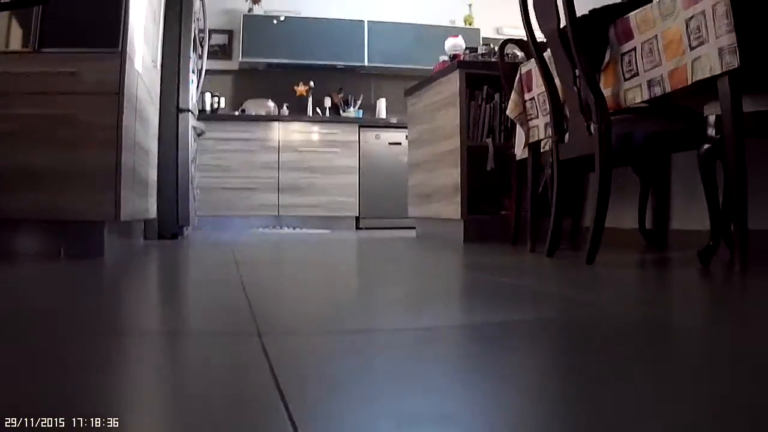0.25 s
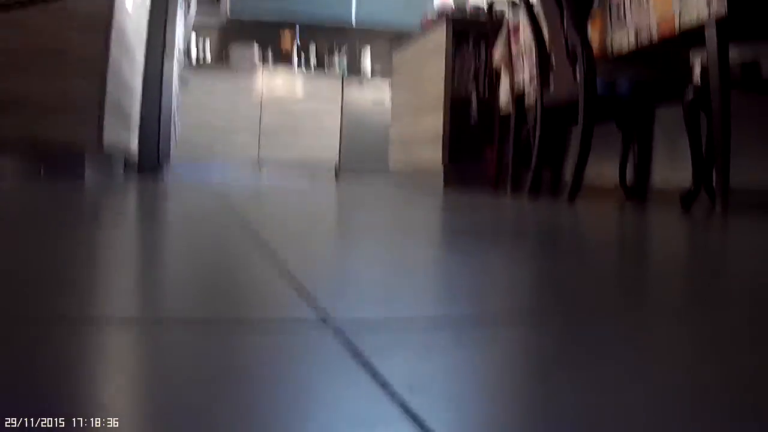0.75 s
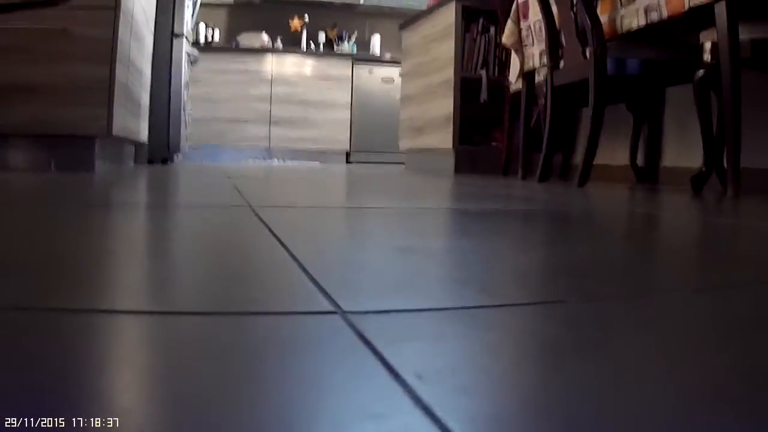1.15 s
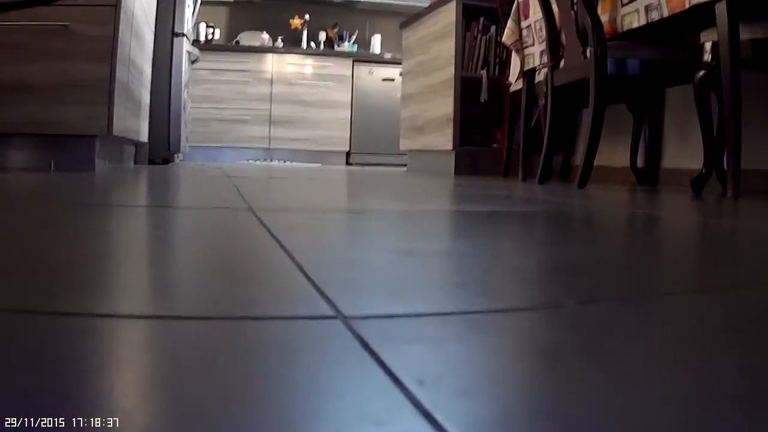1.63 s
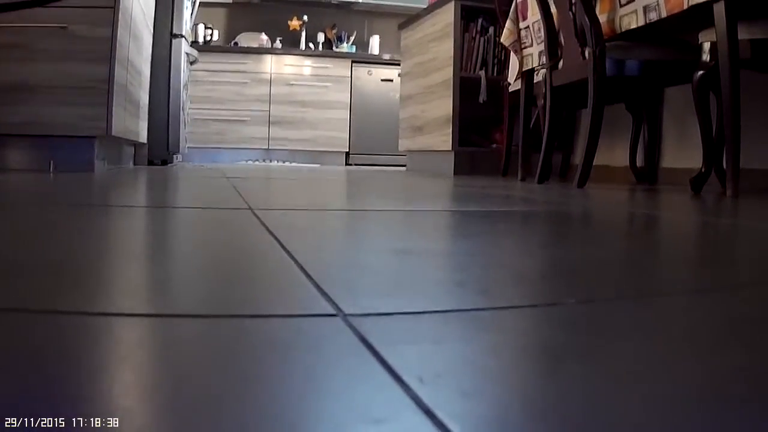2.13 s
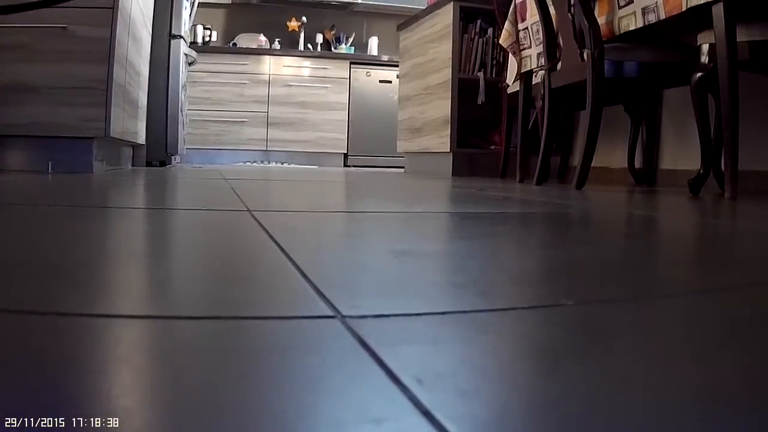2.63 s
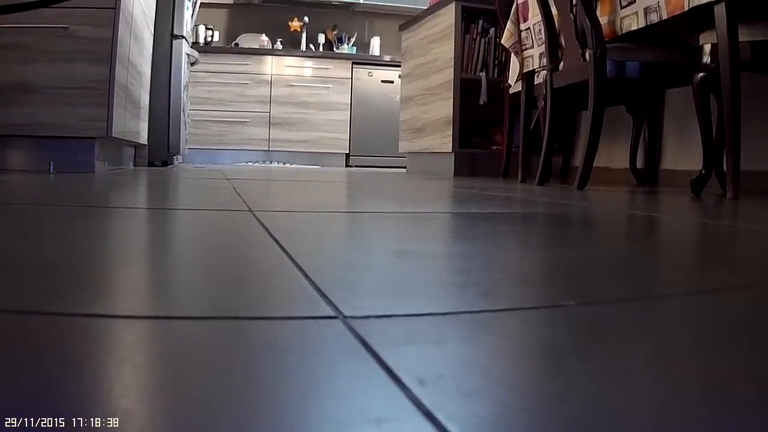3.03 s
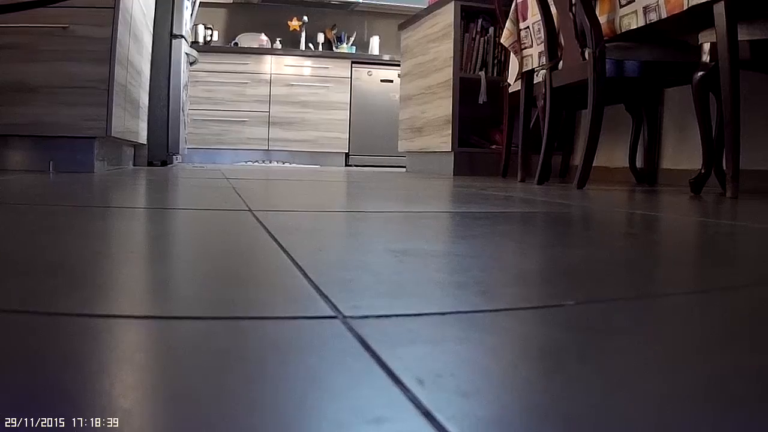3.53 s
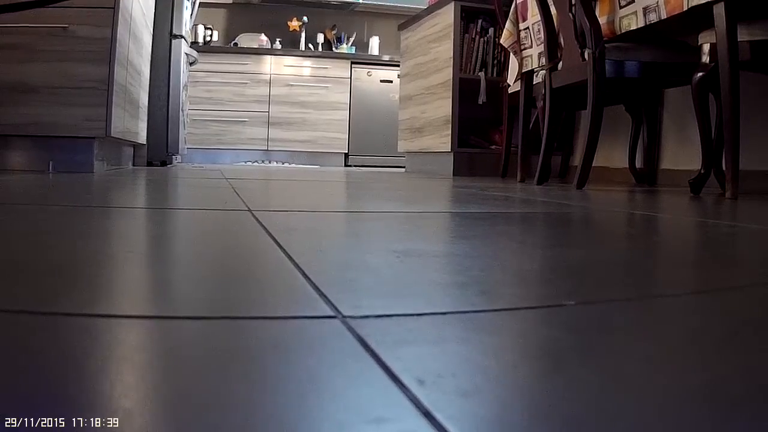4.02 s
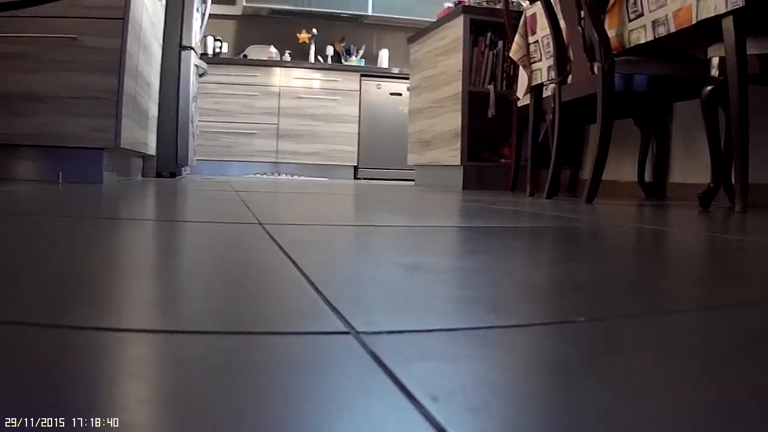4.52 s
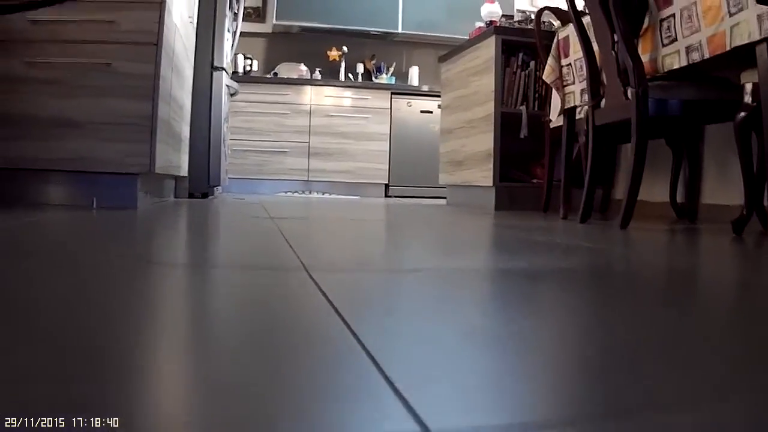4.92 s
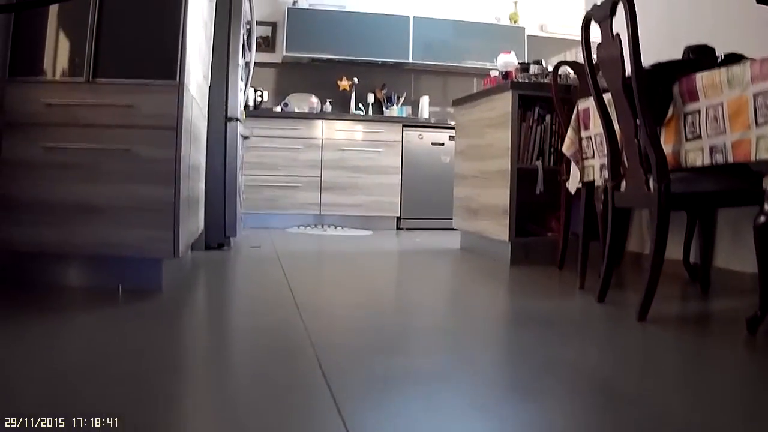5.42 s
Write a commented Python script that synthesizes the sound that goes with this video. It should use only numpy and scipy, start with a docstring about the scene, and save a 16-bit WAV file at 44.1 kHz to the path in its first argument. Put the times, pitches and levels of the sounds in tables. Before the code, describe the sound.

A small plastic drone clacks down on kitchen tile, sits in near silence, then its motors whine up into a steady high buzz.

```python
"""A small geared quadcopter is set down on a kitchen floor: legs crack on tile, the frame rings, loose parts chatter.
It waits over quiet room tone, with a few small clicks, a faint rustle and a knock across the room.
Then the switched motor current whistles while four brushed motors spin up, with shaft tones and gear rasp.
The propeller wash swells, then drops away as the craft lifts off into a steady buzz.
Tones are sums of shaft harmonics; rasp, wash and impacts are shaped noise; struck parts are decaying modes."""
import sys
import numpy as np
from scipy import signal
from scipy.fft import rfft, irfft, next_fast_len
from scipy.io import wavfile
from scipy.ndimage import map_coordinates

SR = 44100
rng = np.random.default_rng(int(sys.argv[2]) if len(sys.argv) > 2 else 0)


def store_pcm(level_fs):
    """Save levels as 16-bit WAV."""
    pcm = np.round(np.clip(level_fs, -1, 1) * 32767).astype(np.int16)
    wavfile.write(sys.argv[1], SR, np.atleast_2d(pcm).T)


N = 249606
T = np.arange(N) / SR  # time [s]

# Noise spectra, shell and echoes below give relative levels; each source sets its own final level.
# Speed asked of each shaft: (time [s], slow motor 1 [Hz], slow motor 2 [Hz], fast motor 1 [Hz], fast motor 2 [Hz])
ASKED_SPEEDS = [(4.08, 644.0, 551.0, 732.0, 718.0), (4.2, 598.0, 572.0, 649.0, 606.0),
                (4.52, 603.0, 599.0, 629.0, 629.0), (4.72, 599.0, 574.0, 639.0, 653.0),
                (4.98, 563.4, 560.6, 667.8, 662.4), (5.24, 568.2, 564.8, 668.8, 664.2),
                (5.36, 561.0, 544.0, 656.4, 653.4), (5.52, 555.4, 536.4, 643.2, 642.0),
                (5.66, 558.4, 541.2, 641.2, 632.4)]
# Shaft harmonics (three rotor poles, nine pinion teeth):
# (multiple of shaft speed [1], relative level of each motor in the order above [dB] x 4)
SHAFT_ORDERS = [(1, -34.5, -26, -19.5, -28.5), (3, -17.7, -20, -23, -29), (4, -50, -43, -35, -40),
                (6, -31, -33, -34, -28), (9, -24, -35, -27.5, -33.5), (10, -52, -48, -35, -59),
                (12, -56, -54, -46, -41), (15, -48, -60, -53, -51)]
# How much strain brings out the orders: one entry per motor [dB]
STRAIN_GAINS = [1.7, 5.1, 5.6, 5.8]
# Blade thrum of each propeller before the speed law: one entry per motor [dB]
BLADE_LEVELS = [-35, -50, -42, -52.5]
# Response of the plastic shell to the shaft tones: (frequency [Hz], gain [dB])
SHELL_RESPONSE = [(100, -54), (340, -39), (430, -11.5), (650, -7), (850, -7.5), (1100, -10), (1400, -4),
                  (1650, 0.5), (2000, -1.5), (2280, -0.5), (2500, -6), (3400, -13), (4100, -5), (5100, 0.5),
                  (7000, -20), (12000, 3)]
# Spectrum of the gear rasp: (frequency [Hz], relative density [dB])
RASP_SPECTRUM = [(150, -11), (350, -11), (480, -3), (800, 5), (1100, -5.5), (2200, -9), (3000, -3),
                 (3800, 2.5), (5200, 2.5), (7800, 0), (9100, -5), (10400, 2), (11600, -11.5), (15000, -18),
                 (15700, -32)]
# Main shell resonance, driven by the gears: (frequency [Hz], relative density [dB])
DRONE_SPECTRUM = [(600, -115), (1200, -5), (1600, 16), (2150, 10.5), (2600, -5.5), (4000, -101)]
# Spectrum of the propeller wash: (frequency [Hz], relative density [dB])
WASH_SPECTRUM = [(15, 0), (50, -2), (100, -6), (200, -10), (350, -19), (800, -40)]
# Harmonics of the switched current: (multiple [1], relative level [dB], scale of the phase ripple [rad])
WHISTLE_ORDERS = [(1, -1.5, 0.88), (2, -8.5, 1.3), (3, -22, 1.4), (4, -38, .7)]
# Legs meeting the tiles: (time [s], blow level [dB], ring level relative to the blow [dB])
LEG_BLOWS = [(0.6788, -17.5, -11), (0.6868, -16.5, -2), (0.6914, -21.5, 1), (0.7473, -15.5, -7),
             (0.7966, -22, 2.5)]
# Modes of the frame: (frequency [Hz], mean relative level [dB], t60 [s])
FRAME_MODES = [(647, 4, 0.11), (947, 2.5, 0.029), (1322, 0.5, 0.078), (1680, -3, 0.023),
               (1887, -6.5, 0.074), (2120, -14, 0.045), (2970, -22, 0.043)]
# Spectrum of an impact crack: (frequency [Hz], relative density [dB])
CRACK_SPECTRUM = [(60, 6), (200, -15), (500, -2), (1500, 10), (3000, -8), (6500, -4), (9000, -16),
                  (12000, -15.5), (15500, -39)]
# Blows to one arm of the frame: (time [s], relative level [dB])
ARM_STRIKES = [(.69, -11), (.918, -39.5)]
# Bursts of loose parts chattering: (time [s], relative level [dB], t60 [s])
RATTLE_BURSTS = [(0.749, -28.5, .18), (.812, -29.5, 0.12), (.9, -56, .45)]
# Small clicks around the room: (time [s], relative level [dB], knock level relative to the click [dB])
SMALL_CLICKS = [(0.5854, -55, 12), (0.9885, -42, -3), (1.0991, -53, -14), (1.8668, -61.5, 22),
                (1.9066, -47, -16), (1.933, -45, -14), (2.0554, -52, -10), (2.7982, -52, 9),
                (3.0133, -56, -10), (3.5865, -51, -12), (3.6363, -46, -12), (3.8222, -38, 3),
                (3.8836, -28.5, -4)]
# Spectrum of the dry click: (frequency [Hz], relative density [dB])
TICK_SPECTRUM = [(500, 2), (2000, -2), (3700, 4), (5000, -1), (7500, -1), (10000, -4), (15500, -16)]
# Spectrum of its hollow knock: (frequency [Hz], relative density [dB])
KNOCK_SPECTRUM = [(200, -9), (500, 3), (800, 2), (1200, -2), (1650, 2), (2200, -11), (4000, -33)]
# Spectrum of the distant knock: (frequency [Hz], relative density [dB])
FAR_KNOCK_SPECTRUM = [(300, -38), (550, -20), (760, -2), (1100, -0.5), (1600, 4), (2200, -12), (2900, -18),
                      (3700, -10), (6000, -18), (13000, -43)]
# Spectrum of the rustle: (frequency [Hz], relative density [dB])
RUSTLE_SPECTRUM = [(1470, -46), (2500, -21), (4040, 1), (5750, -6), (7530, -3), (8680, -9), (10200, 0),
                   (15000, -21)]
# Drift of the room hiss: (time [s], relative level [dB])
HISS_DRIFT = [(1.2, -63), (1.52, -64.5), (1.88, -62), (3.72, -65.5), (3.8, -62.5)]
# Spectrum of the room hiss: (frequency [Hz], relative density [dB])
HISS_SPECTRUM = [(40, -3), (160, 1), (300, -2), (420, -6), (800, -7), (1500, -6), (2400, -16), (5000, -19),
                 (10000, -20), (15500, -23)]
# Spectrum of the room rumble: (frequency [Hz], relative density [dB])
RUMBLE_SPECTRUM = [(8, -1), (22, 15.5), (30, 6), (50, -15), (120, -94)]
# Reverberation of the kitchen: (frequency [Hz], t60 [s])
ROOM_DECAY = [(150, 1), (1500, 0.46), (5000, 0.42), (14000, 0.39)]

POWER_ON_S = 3.882
SPIN_FROM_S, SPIN_UP_S = 3.865, 1.13  # start and length of the run-up
EASE_S, EASED_S = 4.454, 4.835  # the strain on the gears lets go between these times
LIFT_S, CLIMB_S = 4.704, 0.76  # lift-off, and the time taken to clear the floor's backwash
THROTTLE_S, IDLE_DUTY, HOVER_DUTY = 0.85, 0.051, 0.94  # opening time, duty cycle from and to
HOVER_HZ = 600  # reference shaft speed for the wash
MESH_HZ = 161  # shaft speed at which the gears bite fully
SLIP = 0.014  # scale of the shaft angle jitter [rad]
SWITCH_HZ = 3667.5  # switching frequency of the motor current
ECHO_DB = -14  # room echo of the rotor tones
TOP_HZ = 15750  # band limit of the microphone channel


def flight(rasp_db=-24.5, rasp_strain_db=6.0, rasp_power=3.45, grain_db=0.7,
           drone_db=-29.5, hammer_db=21.5, hammer_power=4, drone_power=3.0):
    """Gear noise: tooth contact, more regular with speed and louder under strain, joins the rotor tones."""
    speed = shaft_speeds().mean(axis=0)
    tones, chatter = rotors()
    regular = 0.8 * (speed / speed.max()) ** 2  # power share of the repeating tooth pattern
    teeth = np.sqrt(regular) * chatter + np.sqrt(1 - regular) * rng.standard_normal(N)
    teeth = teeth * amp(grain_db * wobble(350))
    rasp_gain = bite(rasp_power) * amp(rasp_db + rasp_strain_db * strain())
    rasp = rasp_gain * unit(coloured(teeth, RASP_SPECTRUM))
    # the loose gears hammer the shell hardest while they accelerate
    drone_gain = bite(drone_power) * amp(drone_db + hammer_db * acceleration() ** hammer_power)
    drone = drone_gain * unit(coloured(teeth, DRONE_SPECTRUM))
    # the room's echo lags behind the rising tones and beats with them
    echo = amp(ECHO_DB) * room(tones)
    return (tones + echo + rasp + drone) * (T > POWER_ON_S)


def rotors(gear_ratio=10.9, eccentric_rad=0.046, flutter_db=1.0, sway_db=2.16, brush_db=-9,
           full_hz=560, pull_db=5, bite_power=2.9, sing_hz=225):
    """Order synthesis: shaft harmonics plus a geared two-blade propeller's thrum; gives tones and chatter."""
    tones, blades, chatter = np.zeros((3, N))
    for motor, speed in enumerate(shaft_speeds()):
        turns = np.cumsum(speed) / SR
        prop_turns = turns / gear_ratio
        # backlash and an off-centre gear shake the shaft angle
        backlash = SLIP * wobble(130)
        off_centre = eccentric_rad * turn_pattern(prop_turns, count=4)
        angle = 2 * np.pi * turns + backlash + off_centre
        load = amp(flutter_db * wobble(45))
        edge_db = STRAIN_GAINS[motor] * strain()
        for multiple, *levels in SHAFT_ORDERS:
            strained = round(multiple) != 3  # strain brings out every order but the pole tone
            level_db = levels[motor] + strained * edge_db + sway_db * wobble(9.9)
            tones += load * amp(level_db) * np.sin(round(multiple) * angle)
        # two blades pass per propeller turn
        thrum = np.sin(4 * np.pi * prop_turns) + 0.16 * np.sin(8 * np.pi * prop_turns)
        blades += amp(BLADE_LEVELS[motor]) * (speed / full_hz) ** 2 * load * thrum
        # uneven teeth repeat with the propeller, brush scrape with the shaft
        chatter += turn_pattern(prop_turns, count=260)
        chatter += amp(brush_db) * turn_pattern(turns, count=24)
    # pull raises the tones most at the start of the run-up
    drive = bite(bite_power, sing_hz) * amp(pull_db * acceleration() ** 3)
    return np.sqrt(2) * (coloured(drive * tones, SHELL_RESPONSE) + blades), unit(chatter)


def shaft_speeds():
    """Run-up kinematics: each shaft closes in on the speed asked of it [Hz]."""
    return np.array(curves(ASKED_SPEEDS)) * (1 - acceleration() ** 2)


def acceleration():
    """Linear decline of motor pull: 1 until the run-up starts, 0 once up to speed."""
    return 1 - ramp(SPIN_FROM_S, SPIN_UP_S)


def strain():
    """Gear load: held at 1 through most of the run-up, then relieved to 0 around lift-off."""
    return 1 - ramp(EASE_S, EASED_S - EASE_S)


def bite(power, mesh_hz=MESH_HZ):
    """Power law of gear excitation: gain grows with speed until the teeth mesh fully."""
    return np.minimum(shaft_speeds().mean(axis=0) / mesh_hz, 1) ** power


def turn_pattern(turns, count):
    """Rotational periodicity: a random unevenness of count harmonics that repeats with each turn."""
    harmonics = rng.standard_normal(count) + 1j * rng.standard_normal(count)
    pattern = irfft(np.r_[0, harmonics], 16 * count)
    return unit(np.interp(turns % 1, np.linspace(0, 1, len(pattern)), pattern))


def wash(wash_db=-29.0, speed_power=2.7, clear_db=-23, gust_db=3.0):
    """Ground effect: air thrown back by the floor buffets the microphone until the climb clears it."""
    thrust = (shaft_speeds().mean(axis=0) / HOVER_HZ) ** speed_power
    height = ramp(LIFT_S, CLIMB_S) ** 2
    level_db = wash_db + clear_db * height + gust_db * wobble(16)
    return thrust * amp(level_db) * noise(WASH_SPECTRUM)


def controller(whistle_db=-22, opening=0.69, hum_hz=101, hum_db=-48):
    """Pulse-width modulation: the current whistles, loudest at half throttle, over a constant low hum."""
    throttle = ramp(POWER_ON_S, THROTTLE_S) ** opening
    duty = np.clip(IDLE_DUTY + (HOVER_DUTY - IDLE_DUTY) * throttle, 0, 1)
    # commutation, three times a turn, adds sidebands that fan out with speed
    ripple = np.zeros(N)
    for speed in shaft_speeds():
        ripple += np.sin(6 * np.pi * np.cumsum(speed) / SR + rng.uniform(0, 2 * np.pi)) / 2
    whistle = np.zeros(N)
    for multiple, db, depth in WHISTLE_ORDERS:
        phase = 2 * np.pi * round(multiple) * SWITCH_HZ * T
        whistle += amp(db) * np.sin(phase + depth * ripple)
    whistle *= amp(whistle_db) * np.sin(np.pi * duty)
    hum = amp(hum_db) * np.sin(2 * np.pi * hum_hz * T)
    return np.sqrt(2) * (whistle + hum) * (T > POWER_ON_S)


def landing(crack_db=-6, crack_t60=0.04, ring_db=-13, room_db=-19):
    """Impact excitation: each leg cracks on the tile and rings the frame."""
    out, t = np.zeros(N), T[:SR // 2]
    for s, db, body_db in LEG_BLOWS:
        crack = amp(crack_db) * noise(CRACK_SPECTRUM, size=len(t)) * amp(-60 * t / crack_t60)
        ring = amp(body_db + ring_db) * frame_ring()
        add(out, s, amp(db) * (crack + ring))
    return out + amp(room_db) * room(out)


def frame_ring():
    """Modal decay: the plastic frame's modes, at new strengths for each call."""
    t = T[:SR // 2]
    ring = np.zeros(len(t))
    for hz, level, t60 in FRAME_MODES:
        ring += amp(level + rng.normal(0, 1.7) - 60 * t / t60) * np.sin(2 * np.pi * hz * t)
    return ring


def arm(hz=651, rise=0.018, t60=0.16, room_db=-26):
    """Delayed resonance: one arm takes up the landing blow, then rings once more as the frame rocks back."""
    out, t = np.zeros(N), T[:SR // 2]
    for s, db in ARM_STRIKES:
        envelope = amp(db - 60 * t / t60) * (1 - np.exp(-t / rise))
        add(out, s, envelope * np.sin(2 * np.pi * hz * t))
    return out + amp(room_db) * room(out)


def rattle(tick_db=-7, tick_t60=0.011, body_db=-3, rise=0.006):
    """Random impact train: loose parts chatter in the frame as it settles, in bursts that die away."""
    level = np.zeros(N)
    for s, db, t60 in RATTLE_BURSTS:
        add(level, s, amp(db - 60 * T / t60) * (1 - np.exp(-T / rise)))
    taps = (rng.random(N) < 900 / SR) * rng.standard_normal(N)  # about 900 taps a second
    t = T[:SR // 20]
    tick = noise(CRACK_SPECTRUM, size=len(t)) * amp(-60 * t / tick_t60)
    ticks = signal.fftconvolve(taps, tick)[:N]
    body = signal.fftconvolve(taps, frame_ring())[:N]
    return level * (amp(tick_db) * unit(ticks) + amp(body_db) * unit(body))


def clicks(tick_db=-8, tick_t60=0.017, knock_db=-8, knock_t60=0.033, room_db=-2):
    """Transient and reverberation: small dry clicks, each with a hollow knock and the room's answer."""
    out, t = np.zeros(N), T[:SR // 4]
    for s, db, body_db in SMALL_CLICKS:
        tick = noise(TICK_SPECTRUM, size=len(t)) * amp(tick_db - 60 * t / tick_t60)
        knock = noise(KNOCK_SPECTRUM, size=len(t)) * amp(knock_db + body_db - 60 * t / knock_t60)
        add(out, s, amp(db) * (tick + knock))
    return out + amp(room_db) * room(out)


def far_knock(s=3.083, db=-37, t60=0.03, room_db=6):
    """Reverberant field: something hard is knocked across the room, more echo than blow."""
    out, t = np.zeros(N), T[:SR // 4]
    add(out, s, noise(FAR_KNOCK_SPECTRUM, size=len(t)) * amp(db - 60 * t / t60))
    return out + amp(room_db) * room(out)


def rustle(start=2.05, rise=0.015, t60=1.3, level_db=-64, grain_db=2.5):
    """Amplitude-modulated noise: a faint, bright rustle somewhere in the room dies away."""
    decay_db = -60 * np.abs(T - start) / t60
    envelope = ramp(start, rise) * amp(level_db + decay_db + grain_db * wobble(40.3))
    return envelope * noise(RUSTLE_SPECTRUM)


def room_tone(hiss_db=-62.5, rumble_db=-63):
    """Ambient noise floor: low rumble and a soft, slowly drifting hiss."""
    drift, = curves(HISS_DRIFT)
    drift = drift - drift[T < POWER_ON_S].mean()
    return amp(hiss_db + drift) * noise(HISS_SPECTRUM) + amp(rumble_db) * noise(RUMBLE_SPECTRUM)


def room(x):
    """Reverberation: x convolved with a noise tail of unit energy whose treble dies first."""
    hz, t, z = signal.stft(rng.standard_normal(SR // 2), SR, nperseg=256)
    decay = amp(-60 * t / along(ROOM_DECAY, hz)[:, None])
    tail = signal.istft(z * decay, SR, nperseg=256)[1]
    return signal.fftconvolve(x, tail / np.linalg.norm(tail))[:len(x)]


def amp(db):
    """Level law: decibels to amplitude gain."""
    return 10 ** (np.asarray(db) / 20)


def unit(x):
    """Normalisation: x scaled to rms 1."""
    return x / np.sqrt(np.mean(x ** 2) + 1e-20)


def along(points, hz):
    """Logarithmic frequency scale: interpolates (frequency [Hz], value) points."""
    f, v = np.transpose(points)
    return np.interp(np.log(hz + 1), np.log(f + 1), v)


def curves(rows):
    """Linear interpolation in time: one curve for each column after the time."""
    s, *columns = np.transpose(rows)
    return [np.interp(T, s, column) for column in columns]


def ramp(start, length):
    """Linear ramp: rises from 0 to 1 over length seconds, then holds."""
    return np.clip((T - start) / length, 0, 1)


def wobble(rate):
    """Slow random modulation: a smooth curve through rate random knots a second."""
    return map_coordinates(rng.standard_normal(int(N * rate / SR) + 4), [T * rate])


def filtered(x, response):
    """Linear filtering: the spectrum of x times a response of frequency."""
    m = next_fast_len(len(x) + SR // 4)
    return irfft(rfft(x, m) * response(np.fft.rfftfreq(m, 1 / SR)), m)[:len(x)]


def coloured(x, spectrum):
    """Spectral shaping: x through (frequency [Hz], gain [dB]) points."""
    return filtered(x, lambda hz: amp(along(spectrum, hz)))


def noise(spectrum, size=N):
    """Shaped random noise of rms 1."""
    return unit(coloured(rng.standard_normal(size), spectrum))


def add(track, s, x):
    """Superposition: mixes x into the track at time s."""
    start = round(s * SR)
    track[start:start + len(x)] += x[:N - start]


def scene():
    """Superposition at one microphone, which feeds both channels."""
    craft = flight() + wash() + controller()
    touchdown = landing() + arm() + rattle()
    background = clicks() + far_knock() + rustle() + room_tone()
    mono = craft + touchdown + background
    return np.array([mono, mono])


def record(dry):
    """Saturation and band limiting: high peaks are rounded off and nothing is kept above TOP_HZ."""
    soft = dry / (1 + (dry / 0.8) ** 6) ** (1 / 6)
    return np.array([filtered(x, lambda hz: hz < TOP_HZ) for x in soft])


dry = scene()
out = record(dry)
store_pcm(out)
```